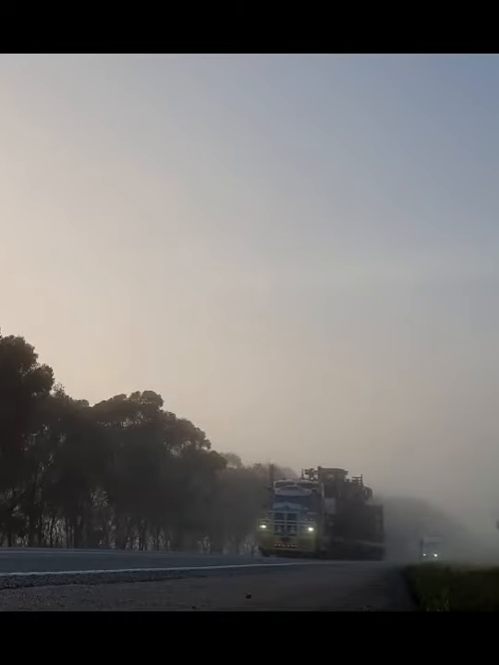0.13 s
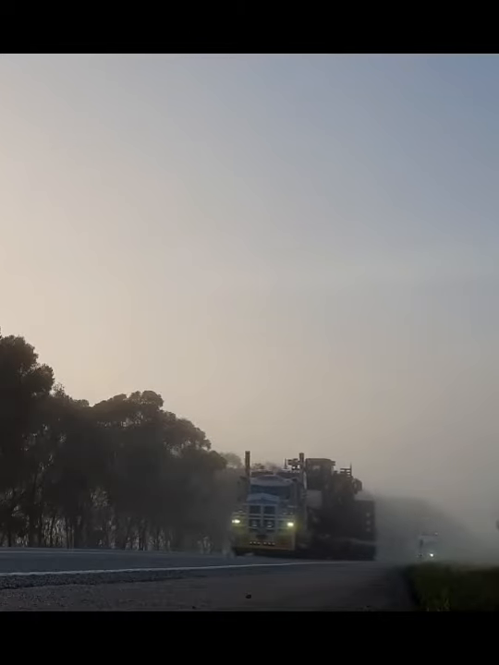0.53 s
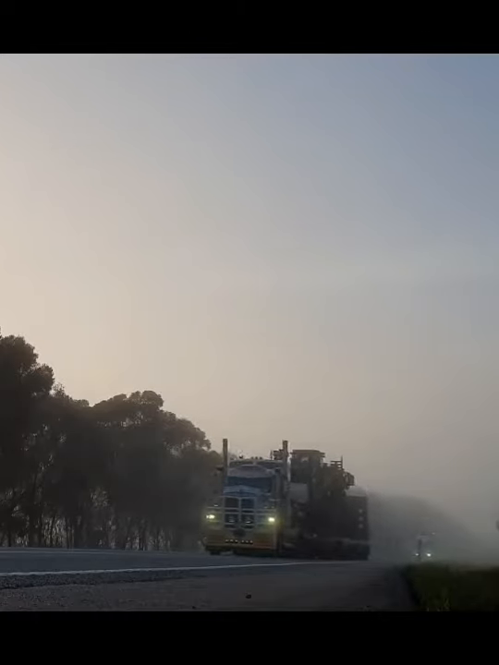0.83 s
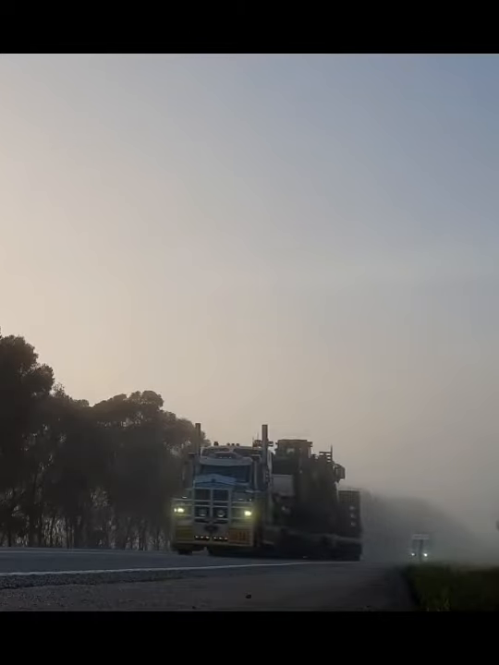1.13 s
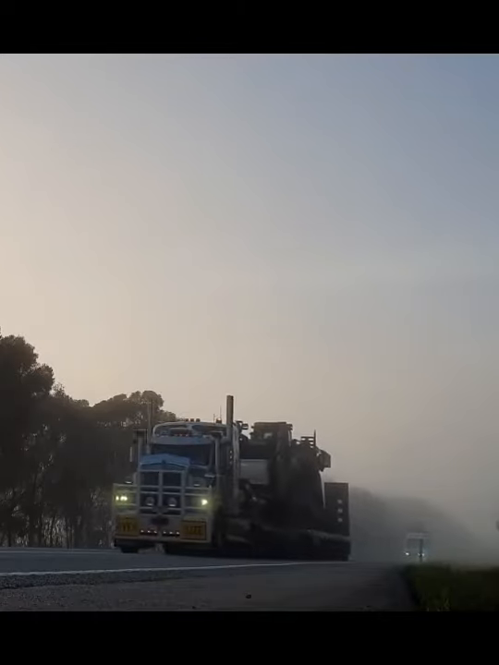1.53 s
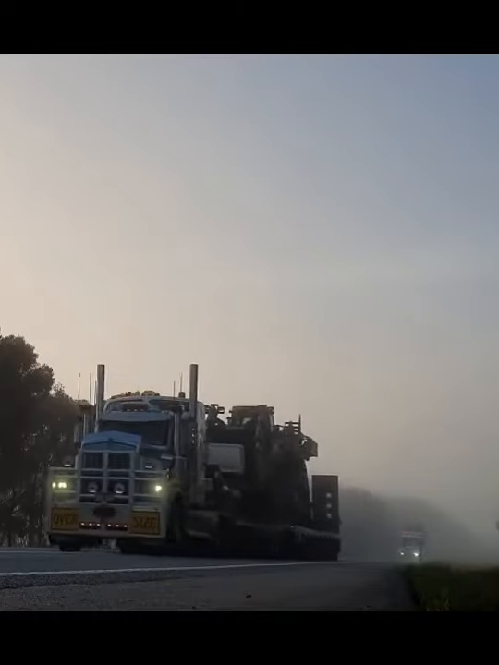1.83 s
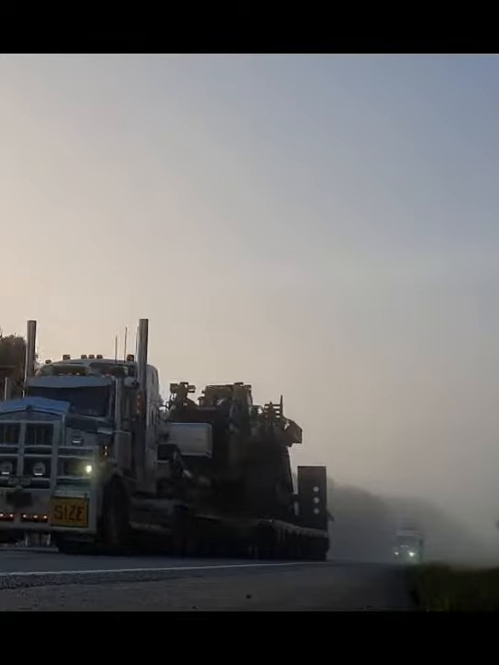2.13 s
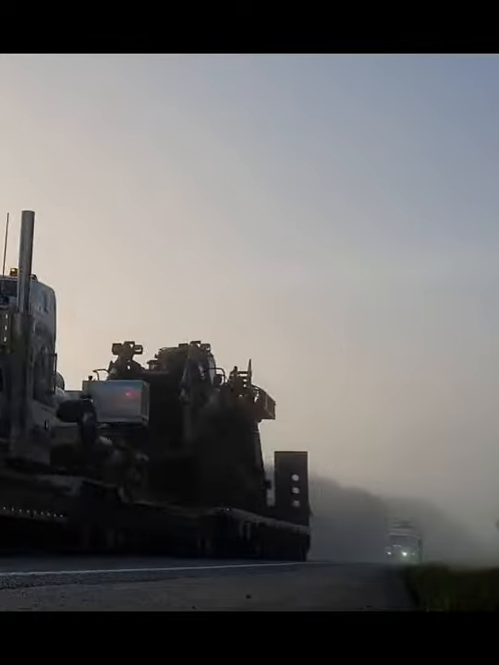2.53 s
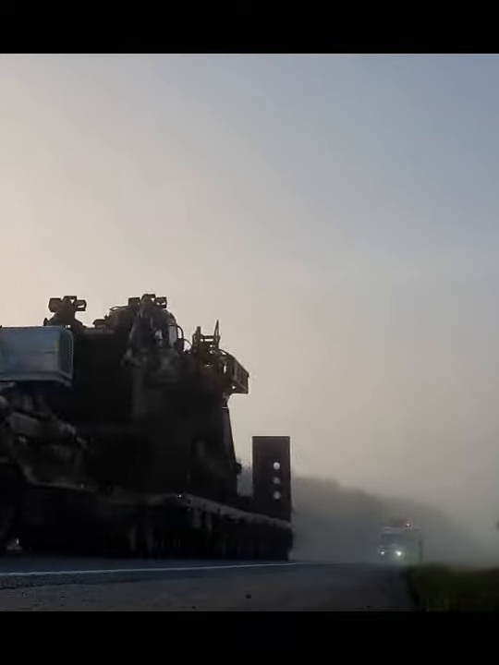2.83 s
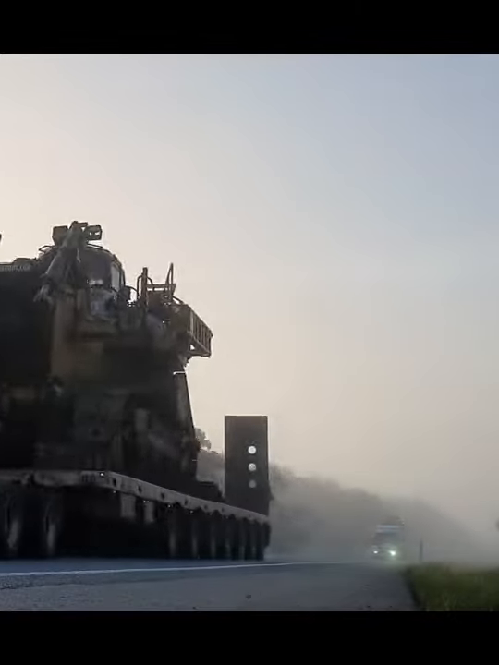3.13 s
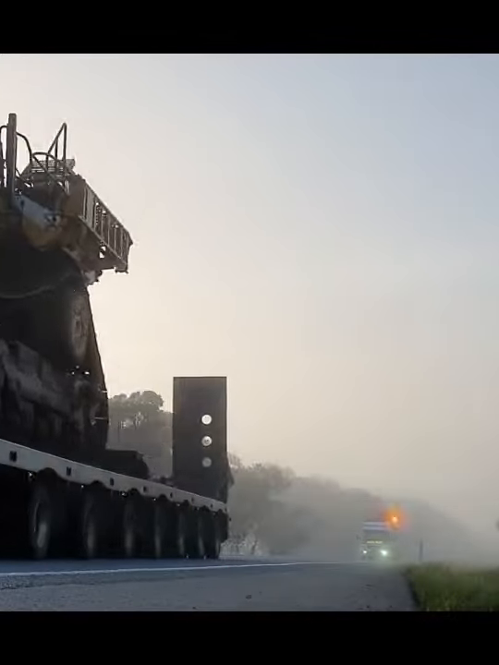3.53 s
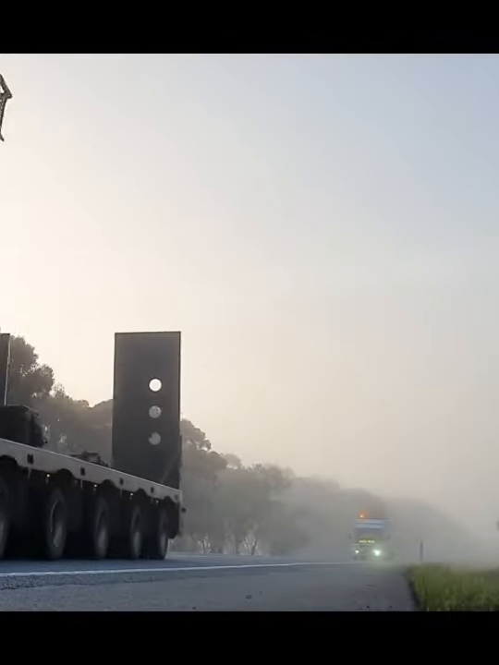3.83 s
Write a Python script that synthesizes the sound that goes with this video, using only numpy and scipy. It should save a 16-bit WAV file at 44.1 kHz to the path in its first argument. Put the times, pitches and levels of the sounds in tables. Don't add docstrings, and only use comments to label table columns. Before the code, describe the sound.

A heavy diesel truck passes a roadside phone in stereo. A low engine hum drops away almost at once; it coasts, with a faint turbo whistle falling until about 1.3 s. Near 1.75 s a lumpy throttle burst brings in a deep, steady exhaust drone. Tyre roar, tread hum and brief gear whine at 2.9 s brighten leftward, peaking around 3.6 s as the drone weakens and sinks slightly in pitch.

```python
import sys
import numpy as np
from scipy import signal
from scipy.io import wavfile
from scipy.ndimage import uniform_filter1d

SR = 44100
rng = np.random.default_rng(int(sys.argv[2]) if len(sys.argv) > 2 else 0)


def convert_level_to_amplitude(level_db):
    exponent = np.asarray(level_db, float) / 20
    return 10 ** exponent


def to_wav(sig):
    pcm = np.clip(np.atleast_2d(sig), -1, 1) * 32767
    pcm = np.round(pcm).astype(np.int16)
    wavfile.write(sys.argv[1], SR, pcm.T)


N = 176400


def read(points, hz):
    table_hz, value = np.transpose(points)
    return np.interp(np.log(hz + 1), np.log(table_hz + 1), value)


def curve(table, column, t=None):
    rows = np.transpose(table)
    return np.interp(np.arange(N) / SR if t is None else t, rows[0], rows[column])


def evened(x):
    return x / np.sqrt(np.mean(x ** 2) + 1e-20)


def slow(rate_hz, t):
    rates = np.geomspace(rate_hz / 20, rate_hz, 24)
    return evened(sum(np.sin(2 * np.pi * (f * t + rng.random())) / np.sqrt(f) for f in rates))


def resonate(x, hz, width_hz):
    turn = np.exp(2j * np.pi * np.cumsum(hz) / SR)
    r = np.exp(-np.pi * width_hz / SR)
    return (turn * signal.lfilter([(1 - r) ** 2], [1, -2 * r, r * r], x / turn)).real


# time_s, lead_samples
LEAD = [(0, -7.5), (1.5, 5.5), (2.4, -0.5), (2.9, 3.5), (3.3, 23), (4, 18.5)]


def placed(x, left_db):
    late = np.interp(np.arange(N) - curve(LEAD, column=1), np.arange(N), x)
    return np.array([x * convert_level_to_amplitude(left_db / 2), late * convert_level_to_amplitude(-left_db / 2)])


# time_s, firing_hz
FIRING_RATE = [(0, 79.8), (1.0, 79.3), (1.8, 79.3), (2.3, 78.28), (2.85, 77.32), (3.15, 76.9),
               (3.35, 76.03), (3.58, 72.5), (3.8, 72.65), (4, 71.6)]


def firing():
    hz = curve(FIRING_RATE, column=1) + .1 * slow(12, np.arange(N) / SR)
    return hz, np.cumsum(hz) / SR


# pitch_hz, level_db
GEAR_LINES = [(3780, -61.5), (5690, -60), (7560, -66.5)]
# time_s, level_db
GEAR_SWELL = [(0, -32.5), (2.6, -33), (2.95, 2), (3.4, -29), (3.7, -13), (4, -2)]
# time_s, pitch_hz, level_db
TURBO = [
    (0, 9000, -86),
    (.4, 7500, -79),
    (.8, 6600, -82),
    (1.2, 6000, -88),
    (1.4, 5800, -110),
]


def whines(hz):
    gear = 0
    for pitch_hz, level_db in GEAR_LINES:
        line = resonate(rng.standard_normal(N), pitch_hz * (hz / 77) ** 0.13, width_hz=18)
        gear = gear + convert_level_to_amplitude(level_db) * evened(line)
    turbo = convert_level_to_amplitude(curve(TURBO, column=2)) * np.sin(2 * np.pi * np.cumsum(curve(TURBO, column=1)) / SR)
    return placed(gear * convert_level_to_amplitude(curve(GEAR_SWELL, column=1)) + turbo, left_db=12)


# pitch_hz, width_hz, level_db, doppler_share, gain_when_near_db
TREAD_HUMS = [(284.8, 7, -3.5, 0.93, 2), (530.2, 9.7, -8, 0.34, 1.5), (610.7, 25, -10, 0.23, 2.5),
              (2069, 79, -14, 0.13, -7.5)]


def tread_hum(hz):
    near = curve(ROAD, column=2)
    hum = 0
    for pitch_hz, width_hz, level_db, slide, near_db in TREAD_HUMS:
        tone = resonate(rng.standard_normal(N), pitch_hz * (hz / hz[0]) ** slide, width_hz)
        hum = hum + convert_level_to_amplitude(level_db + near_db * near) * evened(tone)
    return placed(hum * convert_level_to_amplitude(curve(ROAD, column=1)), left_db=5.1)


# time_s, level_db
INTAKE = [(0, -68), (1.3, -59), (1.7, -40), (2.05, -40), (2.35, -50), (2.9, -45), (3.2, -37), (4, -56.5)]


def intake_howl():
    howl = evened(resonate(rng.standard_normal(N), np.full(N, 1343), width_hz=99))
    return placed(howl * convert_level_to_amplitude(curve(INTAKE, column=1)), left_db=5.1)


# time_s, roar_db, nearness (0-1)
ROAD = [(0, -43.5, 0.03), (.4, -43, 0.04), (.9, -42, 0.03), (1.05, -41, 0.22), (1.5, -35.5, 0.07),
        (1.71, -32, .32), (1.8, -33.5, .1), (2.2, -37.5, 0.07), (2.5, -36, 0), (2.9, -33.5, 0.5),
        (2.96, -32, 0.7), (3.1, -29, 0.66), (3.4, -27.5, 0.84), (3.65, -26.5, 0.74), (3.74, -27, 0.57),
        (4, -30, 0.41)]
# freq_hz, density_db (per Hz)
FAR = [(30, -23.5), (80, 3), (150, -2), (240, -13.5), (600, -14), (2040, -24.5), (4000, -38.5),
       (12000, -82)]
# freq_hz, density_db (per Hz)
NEAR_COLOUR = [(30, -32.5), (50, -5.5), (130, -3), (270, 3.5),
               (430, -6), (600, -5), (1000, -8.5), (2200, -21), (3900, -25.5), (8500, -34.5), (11400, -29.5),
        (14500, -37)]
# freq_hz, likeness (0-1)
SAME_FAR = [(60, .99), (300, 1), (700, .92), (1400, 0.83), (3000, 0.2), (8000, 1)]
# freq_hz, likeness (0-1)
SAME_NEAR = [(60, 0.82), (300, 0.54), (700, 0.71), (1400, 0.35), (3000, 0.17), (8000, 0.47)]
# freq_hz, left_db
LEFT_DB = [(60, 0), (250, 1.3), (700, 2.8), (2000, 5), (3500, 5.5), (5000, 11), (8000, 16), (12000, 17)]


def road(turns):
    frames, hz = N // 256 + 5, np.fft.rfftfreq(1024, 1 / SR)
    t = np.arange(frames) * 256 / SR
    a, b, c, d, patches = rng.standard_normal((frames, 513, 5)).T
    patches = uniform_filter1d(patches, size=12, axis=0)
    patches = evened(uniform_filter1d(patches, size=12, axis=1))
    near = np.clip(curve(ROAD, column=2, t=t), 0, 1.2)

    def blend(far, close):
        return read(far, hz)[:, None] * (1 - near) + read(close, hz)[:, None] * near

    colour = convert_level_to_amplitude(blend(FAR, NEAR_COLOUR))
    band = (hz > 600) & (hz < 2500)
    colour = colour / np.sqrt((colour[band] ** 2).sum(0))

    same = np.clip(blend(SAME_FAR, SAME_NEAR), 0, 1)
    left = a + 1j * b
    right = same * left + np.sqrt(1 - same ** 2) * (c + 1j * d)
    late = np.exp(-2j * np.pi * hz[:, None] * curve(LEAD, column=1, t=t) / SR)
    side_db = read(LEFT_DB, hz)[:, None] / 2 * (.8 + .25 * near)
    z = np.array([left * convert_level_to_amplitude(side_db), late * convert_level_to_amplitude(-side_db) * right])

    patch_db, swell_db = 1.5, .4
    level_db = patch_db * patches + swell_db * slow(5, t) + curve(ROAD, column=1, t=t)
    roar = signal.istft(z * colour * convert_level_to_amplitude(level_db), nperseg=1024, noverlap=768)[1][:, :N]
    flutter = 1 + .092 * np.cos(2 * np.pi * turns)
    return convert_level_to_amplitude(2.5) * roar * flutter


def kick():
    centre_s, width_s = 1.75, .055
    t = np.arange(N) / SR
    stack = signal.butter(2, [90, 330], "bandpass", fs=SR, output="sos")
    lumps = evened(signal.sosfilt(stack, rng.standard_normal(N)))
    return placed(convert_level_to_amplitude(-22.5) * lumps * np.exp(-((t - centre_s) / width_s) ** 2), left_db=1.2)


# time_s, firing_db, second_db, third_db, high_orders_db
ENGINE = [(0, -12.5, -17, -41, -31.5), (.04, -21, -45, -27.5, -51), (.09, -30, -45.5, -47, -54),
          (.4, -31, -43.5, -49, -68), (.9, -42, -41, -47.5, -65), (1.5, -29.5, -47, -57, -54),
          (1.67, -24.5, -52, -51, -60.5), (1.74, -13, -20.5, -28.5, -47), (1.82, -7.5, -21.5, -30, -30),
          (2.2, -10, -24.5, -29.5, -33), (2.75, -10, -25, -24, -40), (3.0, -11.5, -32.5, -23.5, -49),
          (3.2, -11.5, -29, -24.5, -37.5), (3.35, -11, -21.5, -28, -38.5), (3.56, -18.5, -22, -23.5, -41),
          (3.75, -14.5, -46, -29.5, -30.5), (3.86, -19, -28, -24, -35.5), (4, -18, -32, -23.5, -35)]
# multiple, level_db
HIGH_ORDERS = [(5, 0), (6, -16), (7, -15), (8, -17)]
# sixths_of_firing_rate, level_db (against the firing tone)
CYLINDER_ORDERS = [(4, -34), (5, -35), (7, -34), (8, -30), (10, -32), (13, -39), (16, -36), (19, -35),
                   (20, -37), (29, -35), (31, -33)]


def exhaust(hz, turns):
    t = np.arange(N) / SR
    start_turn = .2
    waver_db = .6

    def order(multiple, level_db, waver_db):
        drift = np.interp(t, t[::64], slow(40, t[::64]))
        chance = (multiple % 1 > 0) * rng.random()
        phase = multiple * turns + chance + start_turn * multiple
        return np.sqrt(2) * convert_level_to_amplitude(level_db + waver_db * drift) * np.sin(2 * np.pi * phase)

    tone_db, high_db = curve(ENGINE, column=1), curve(ENGINE, column=4)
    coasting = np.clip((-22 - tone_db) / 8, 0, 1)
    low = order(1, tone_db, 2.5 * coasting) + order(2, curve(ENGINE, column=2), waver_db)
    boom = evened(resonate(rng.standard_normal(N), hz, width_hz=25))
    low = low + convert_level_to_amplitude(tone_db - 29) * boom

    high = order(3, curve(ENGINE, column=3), waver_db) + order(4, tone_db - 25.5, waver_db)
    for multiple, level_db in HIGH_ORDERS:
        high = high + order(multiple, high_db + level_db, waver_db)
    for sixths, level_db in CYLINDER_ORDERS:
        high = high + order(sixths / 6, tone_db + level_db, 2 * waver_db)
    return placed(low, left_db=.1) + placed(high, left_db=1.2)


def scene():
    hz, turns = firing()
    rolling = whines(hz) + tread_hum(hz) + intake_howl() + road(turns)
    return rolling + kick() + exhaust(hz, turns)


BANDS = [160, 176, 196, 216, 240, 264, 292, 320, 352, 384, 416, 448, 480, 512, 544, 576, 608, 640, 672, 704,
         1025]


def starved(x):
    hz, t, z = signal.stft(x, SR, window="cosine", nperseg=2048, noverlap=1024)
    power = abs(z) ** 2 + 1e-20

    def chance(size):
        return evened(uniform_filter1d(rng.standard_normal(len(t)), size=size))

    loud_db = 10 * np.log10(power.sum(1)) + 12
    floor_db = -76.5 + .99 * loud_db + 2.5 * chance(2)
    keep = np.ones(z.shape)
    for a, b in zip(BANDS, BANDS[1:]):
        band_db = 5 * np.log10((power[:, a:b] ** 2).mean(1) / 2)
        deaf_db = 14.5 * (hz[a] < 10000 < hz[b - 1])
        keep[:, a:b] = (band_db > floor_db + 1.5 * chance(4) + deaf_db)[:, None]
    return signal.istft(z * keep, SR, window="cosine", nperseg=2048, noverlap=1024)[1]


def low_pass(x):
    return signal.sosfilt(signal.butter(12, 14390, fs=SR, output="sos"), x)


def record(dry):
    low_cut = signal.butter(2, 33, "highpass", fs=SR, output="sos")
    cut = signal.sosfiltfilt(low_cut, dry, padtype="even", padlen=4096)
    ceiling = 1.1
    limited = ceiling * np.tanh(cut / ceiling)
    lead_in = 240
    thrifty = starved(np.pad(limited, ((0, 0), (lead_in, 2048)), "reflect"))
    return low_pass(thrifty[:, lead_in:lead_in + N])


dry = scene()
out = record(dry)
to_wav(out)
```